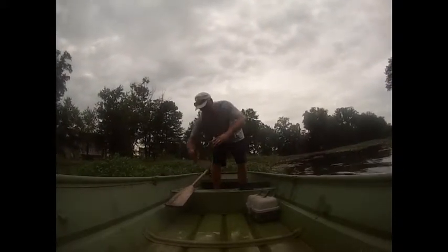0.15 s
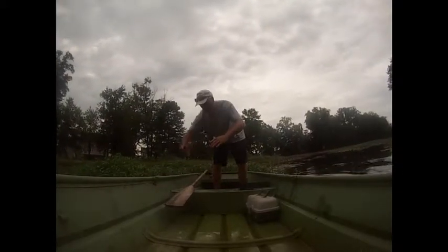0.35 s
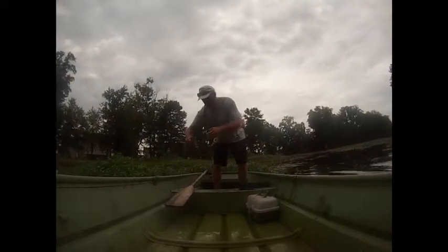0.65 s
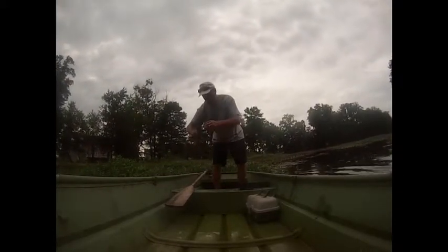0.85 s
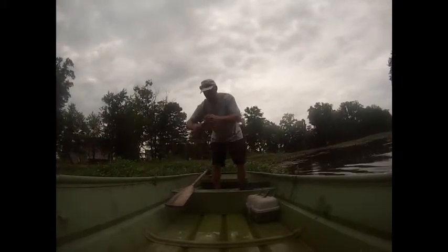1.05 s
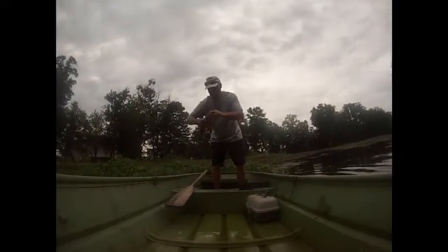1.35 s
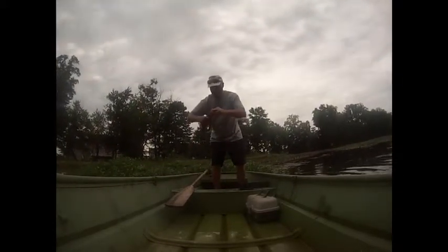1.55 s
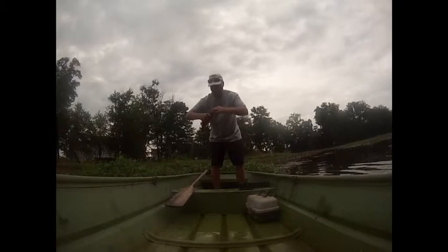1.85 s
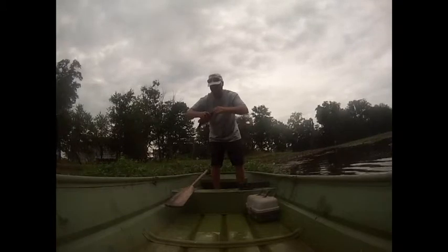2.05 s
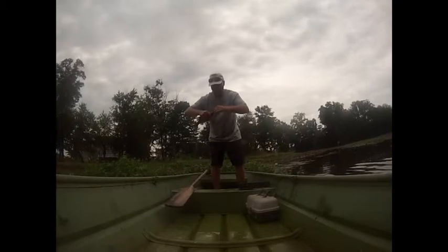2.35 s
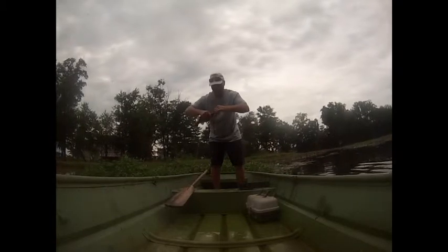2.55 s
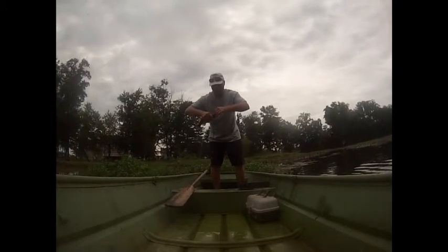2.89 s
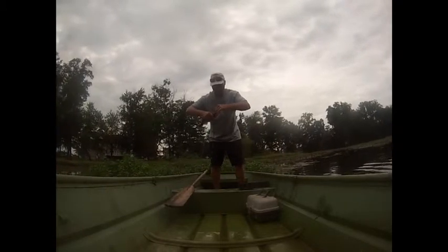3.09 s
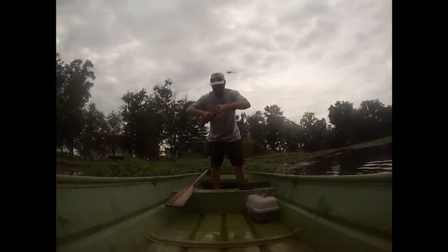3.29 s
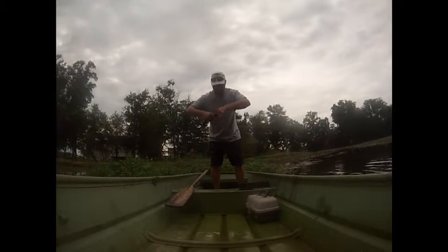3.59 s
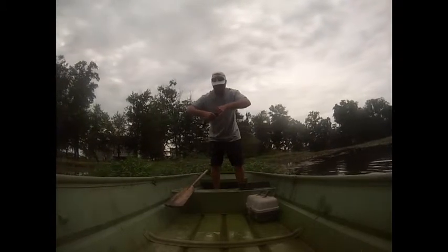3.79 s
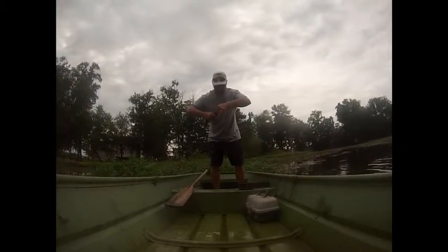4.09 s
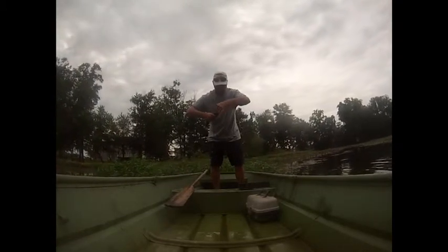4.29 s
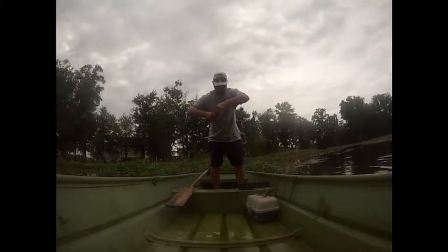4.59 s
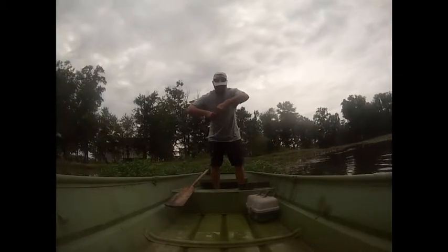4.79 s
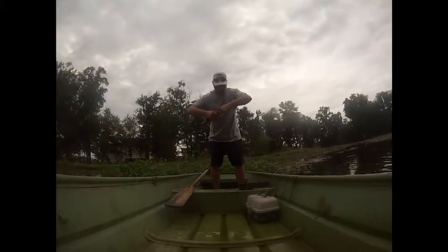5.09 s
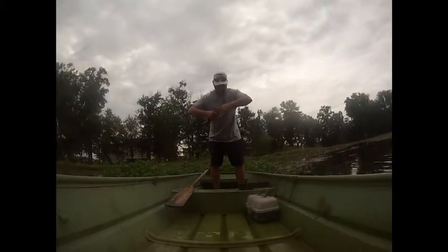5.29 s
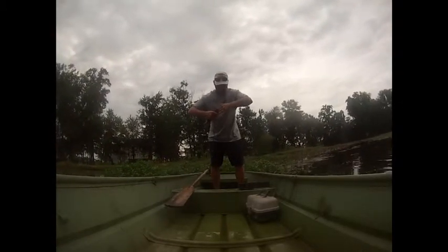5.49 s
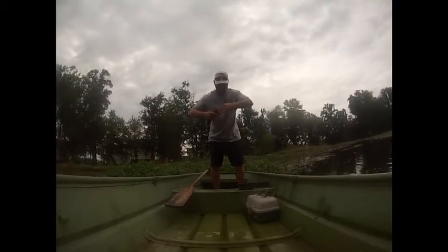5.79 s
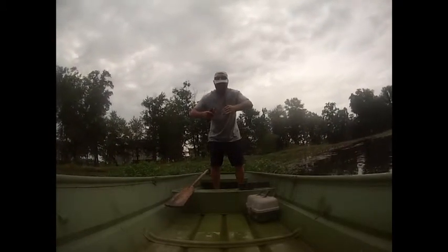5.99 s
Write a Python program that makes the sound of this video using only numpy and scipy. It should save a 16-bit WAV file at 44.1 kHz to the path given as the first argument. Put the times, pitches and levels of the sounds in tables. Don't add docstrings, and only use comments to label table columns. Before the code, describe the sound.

A rapid cluster of hollow thuds and gritty scrapes in an aluminum boat, then a steady low engine drone with water murmur and faint ticks.

```python
import sys
import numpy as np
from scipy import signal
from scipy.fft import rfft, irfft, next_fast_len
from scipy.io import wavfile
from scipy.ndimage import map_coordinates

SR = 44100
rng = np.random.default_rng(int(sys.argv[2]) if len(sys.argv) > 2 else 0)


def generate_wav(signal):
    frames = np.transpose(np.atleast_2d(signal))
    scaled = np.clip(frames, -1, 1) * 32767
    pcm = np.round(scaled).astype(np.int16)
    wavfile.write(sys.argv[1], SR, pcm)


def how_loud(loudness_db):
    steps = np.asarray(loudness_db, float) / 20
    return 10 ** steps


N = 270770
TIME = np.arange(N) / SR


def unit(x):
    return x / np.sqrt(np.mean(x ** 2) + 1e-20)


def curves(rows):
    s, *columns = np.transpose(rows)
    return [np.interp(TIME, s, column) for column in columns]


def wobble(rate):
    knots = rng.standard_normal(int(N * rate / SR) + 4)
    return map_coordinates(knots, [TIME * rate])


def filtered(x, response):
    m = next_fast_len(N + SR // 2)
    return irfft(rfft(x, m) * response(np.fft.rfftfreq(m, 1 / SR)), m)[:N]


def noise(spectrum):
    f, db = np.transpose(spectrum)

    def colour(hz):
        return how_loud(np.interp(np.log(hz + 1), np.log(f + 1), db))

    return unit(filtered(rng.standard_normal(N), colour))


def swell(s, rise, t60):
    t = TIME - s
    onset = np.exp(-np.clip(t / rise, -9, 0) ** 2 * 2)
    decay = how_loud(-60 * np.maximum(t, 0) / t60)
    return np.where(t < 0, onset, decay)


def bump(s, half):
    return np.exp(-((TIME - s) / half) ** 2)


def add(out, s, x):
    out[round(s * SR):][:len(x)] += x


def resonant(force, modes):
    def response(f):
        total = 0
        for k, (centre, width, db) in enumerate(modes):
            damping = 1j * f * width
            total = total + (-1) ** k * how_loud(db) * damping / (centre * centre - f * f + damping)
        return total

    return filtered(force, response)


ENGINE_RUN = [(0, 96.6, -45.5, 5), (.3, 96.3, -41.5, 15.5), (.7, 94.18, -42.5, 9.5), (1.3, 93.75, -40.5, 8),
              (1.6, 94.2, -43.5, 5), (1.8, 93.86, -40, 1), (2.02, 93.77, -47.5, 2), (2.3, 94.3, -38, -1),
              (2.55, 93.94, -40.5, -1), (2.85, 94.1, -37, -2.5), (3.0, 94.1, -38.5, 0.5),
              (3.45, 94.6, -35, -3.5), (3.9, 95.55, -34.5, 1), (4.55, 94.96, -32, -3.5),
              (5.2, 96, -37, -4.5), (5.75, 96.84, -37.5, 0.5), (6.14, 96.5, -37, 6)]
# (multiple of the firing rate, level/dB)
UNEVEN_TONES = [(0.501, -10), (0.752, -19), (1.249, 1), (1.5, -9.5), (1.75, -7), (3, -8), (4.998, -36),
                (5.25, -25), (2.5, -17)]
# (multiple, level/dB)
FAINT_MULTIPLES = [(2, -61), (4, -73.5), (6, -66)]
# (t/s, multiple, level/dB, half length/s)
AIR_SURGES = [(0, 2, -44.5, .25), (0.61, 2, -41, 0.14), (1.4, 2, -52.5, .15), (2.145, 2, -54.5, 0.32),
              (2.79, 2, -52, 0.16), (4.15, 2, -49, 0.59), (5.148, 2, -42.5, 0.67), (0.597, 4, -49.5, 0.15),
              (1, 4, -63, 0.097), (1.4, 4, -59, 0.11), (1.857, 4, -54, 0.15), (2.4, 4, -58, .25),
              (3.094, 4, -60.5, 0.13), (4.45, 4, -58.5, 0.77), (5.202, 4, -57.5, 0.29),
              (6.007, 4, -58.5, 0.19), (.45, 6, -55.5, .3), (1.3, 6, -59, 0.23), (2.296, 6, -59, 0.31),
              (2.844, 6, -64, 0.21), (3.756, 6, -62.5, 0.39), (4.176, 6, -58, 0.041),
              (4.39, 6, -51.5, 0.052), (4.75, 6, -60, .4), (5.02, 6, -56.5, 0.057)]
# (t/s, extra level/dB, half length/s)
CYLINDER_LOPES = [(.8, 5.5, 0.2), (2.753, 3, 0.19), (5.707, 6, 0.58)]
# (f/Hz, level/dB per Hz)
ROAR_COLOUR = [(90, -32), (160, 1), (300, 1), (420, -0.5), (550, 0), (750, -4.5), (950, -16.5), (1500, -46)]


def engine():
    roar_db, uneven_db = -56, -52.5
    uneven_follows = 0.36
    hz, firing_db, labour_db = curves(ENGINE_RUN)
    phase = 2 * np.pi * np.cumsum(hz) / SR + 0.074 * wobble(7)

    def tone(k, db, lag):
        flutter_db = 0.48 * np.sqrt(k) * wobble(6.3)
        return np.sqrt(2) * how_loud(db + flutter_db) * np.cos(k * phase + lag)

    drone = tone(1, firing_db, 0)
    for k, faint_db in FAINT_MULTIPLES:
        size = how_loud(faint_db)
        for s, multiple, db, half in AIR_SURGES:
            if round(multiple) == round(k):
                size = size + how_loud(db) * bump(s, half)
        drone += size * tone(round(k), 0, np.pi)

    lope_db = sum(db * bump(s, half) for s, db, half in CYLINDER_LOPES)
    beat_db = uneven_db + uneven_follows * labour_db + lope_db
    for k, db in UNEVEN_TONES:
        drone += tone(k, beat_db + db, rng.uniform(0, 2 * np.pi))

    throb = how_loud(1.6 * np.cos(phase / 4))
    return drone + how_loud(roar_db + labour_db) * throb * noise(ROAR_COLOUR)


# (f/Hz, width/Hz, level/dB)
WALL_MODES = [(136, 22, -7), (352, 43, -4), (509.5, 15, -2.5), (592, 24, -3.5), (716, 50, -9),
              (783, 47, -9), (907, 33, -8.5), (1007.6, 16, 4.5), (1101, 68, -8), (1585, 230, -25),
              (1880, 320, -26), (2620, 120, -29.5), (3500, 130, -38)]


def wall(force):
    return resonant(force, WALL_MODES)


# (f/Hz, level/dB per Hz)
MURMUR_COLOUR = [(12, -36), (20, -18), (43, -2.5), (70, -5.5), (102, -4.5), (146, -5), (200, -15.5),
                 (238, -16), (430, -20.5), (493, -12), (676, -22), (873, -20), (982, -15.5), (1270, -27.5),
                 (2200, -39.5), (2860, -63), (4840, -120)]
# (f/Hz, level/dB per Hz)
HISS_COLOUR = [(710, -4.5), (1200, -3.5), (1270, -17), (1440, -13), (1830, -6), (2170, -12.5), (2950, -6.5),
               (3960, -13), (5680, -11), (6380, -17.5), (7470, -3), (8490, -23.5), (10500, -26.5),
               (13100, -25.5), (15000, -29)]
# (t/s, level/dB, rise/s, t60/s)
HULL_ROCKING = [(.32, -39, 0.39, 1.3), (5.37, -55.5, 0.61, 1.09)]


def air():
    stir = how_loud(-46.5) + sum(how_loud(db) * swell(s, rise, t60) for s, db, rise, t60 in HULL_ROCKING)
    water = noise(MURMUR_COLOUR) + 0.088 * unit(wall(rng.standard_normal(N)))
    murmur = stir * how_loud(0.56 * wobble(9)) * water
    hiss_db = -57 - 0.23 * (TIME - 3) + 0.2 * wobble(3.9)
    return murmur + how_loud(hiss_db) * noise(HISS_COLOUR)


# (t/s, cloth level/dB, wall level/dB, rise/s, t60/s)
DRAGS = [(.04, -61, -57, .1, .6), (0.273, -55, -25, .015, 0.17), (.39, -57.5, -44.5, 0.065, 1.5),
         (.47, -71, -57, 0.094, 0.26), (.58, -68, -44, 0.0064, 0.052), (2.02, -60.5, -70, 0.086, 0.88),
         (2.06, -74, -58, .01, 0.54), (2.19, -66, -71, .015, .05)]
# (t/s, level/dB, half length/s)
LINE_RUBS = [(3.82, -74, .02), (3.91, -73, 0.022), (4.05, -75, .025), (4.199, -78, 0.018),
             (4.271, -74, .02), (4.48, -76, .02)]


def rustle():
    cloth = noise([(1200, -40), (2200, -2.0), (3000, 3.5), (4200, -2.5), (5500, 1.5),
                   (7000, -15.0), (14000, -32.5)])
    line = noise([(9000, -28), (12500, -3), (13500, 0), (15000, -6), (16000, -38)])
    body = unit(wall(rng.standard_normal(N)))
    drag = sum(how_loud(db) * swell(s, rise, t60) for s, db, _, rise, t60 in DRAGS)
    shake = sum(how_loud(db) * swell(s, rise, t60) for s, _, db, rise, t60 in DRAGS)
    rub = sum(how_loud(db) * bump(s, half) for s, db, half in LINE_RUBS)
    clumps = how_loud(1.6 * wobble(90))
    return drag * clumps * cloth + shake * body + rub * line


# (t/s, wall level/dB, grit level/dB, rise/s, t60/s) # the row at 0.267 s is the bright rasp of
GEAR_SCUFFS = [(0.167, -36, -50, 0.044, 0.059), (0.176, -26, -27, 0.0055, 0.17),
               (0.179, -27, -37, 0.011, 0.11), (.197, -29, -58, 0.007, 0.18),
               (0.267, -28, -61, 0.0075, 0.14), (0.59, -20.5, -30, 0.0089, 0.12),
               (0.604, -24.5, -57, 0.0067, 0.21), (0.65, -40, -62, 0.0091, 0.11)]
# (f/Hz, level/dB per Hz)
GRIT_COLOUR = [(710, -20), (1200, -5), (2240, -15.5), (2540, -12.5), (3530, -18), (5500, -18), (8490, -32),
               (9630, -46.5), (12200, -38.5), (15000, -58)]


def scuffs():
    force = sum(how_loud(db) * swell(s, rise, 0.71 * t60) for s, db, _, rise, t60 in GEAR_SCUFFS)
    spray = sum(how_loud(db) * swell(s, rise, 0.55 * t60) for s, _, db, rise, t60 in GEAR_SCUFFS)
    shaken = how_loud(21.5) * wall(force * rng.standard_normal(N))
    return shaken + spray * how_loud(1.6 * wobble(400)) * noise(GRIT_COLOUR)


# (f/Hz, level/dB, t60/s)
PLATE_MODES = [(73.5, -11.5, 0.082), (143.2, 2, 0.15), (158.3, -3.5, 0.14), (224.2, -9.5, 0.21),
               (288, -10, 0.11), (362.4, -11.5, 0.24), (414, -16.5, 0.19), (530, -21.5, 0.4),
               (592, -31, 0.21), (707, -24.5, 0.61), (777, -17, 0.12), (896, -8, 0.1), (949, -13, 0.092),
               (1120, -21.5, 0.09), (1340, -16.5, 0.082), (1494, -14, 0.052), (1770, -27.5, .06)]
# (t/s, level/dB, contact/ms, drive of the plate's belly/dB) # the belly drive is low near a
# rib, high in mid-panel # the shortest contacts near 0.17-0.21 s and 0.59-0.62 s are the sliding gear's ring,
# played as quick knocks
BLOWS = [(.167, -13.5, 0.53, -9.5), (.178, -14.5, 7.2, 6), (0.182, -18.5, 0.5, -5), (0.194, -28, .4, -7),
         (.205, -23.5, 0.35, -4), (0.235, -11, 7.9, 3.5), (0.264, -22, 0.35, -22),
         (0.2653, -10.5, 1.17, -2.5), (0.2706, -11, 0.95, 1.5), (.283, -14, 0.83, -9),
         (0.301, -13, 0.95, -12.5), (0.329, -17, 2.3, 4), (.341, -19, 1.4, -4), (0.374, -21.5, 4.5, 8),
         (0.433, -13.5, 2, -8.5), (0.457, -29, 1.7, 5.5), (0.466, -20.5, 1.8, -1), (.498, -17, 1.6, -20),
         (.586, -21, 0.26, -5), (.598, -14, 0.86, -18), (.606, -19.5, 0.26, -18), (.617, -18, 0.29, -10),
         (0.627, -26.5, 1.1, -2), (0.667, -38, 2.9, -9)]


def thuds():
    out, t = np.zeros(N), np.arange(SR // 2) / SR
    hz, level, t60 = np.transpose(PLATE_MODES)[:, :, None]
    sides = (-1) ** np.arange(len(PLATE_MODES))[:, None]
    build = 1 - np.exp(-t * hz / 0.31)
    modes = sides * how_loud(level - 60 * t / t60) * build * np.sin(2 * np.pi * hz * t)
    scatter_db = rng.standard_normal((len(BLOWS), len(PLATE_MODES), 1))
    for (s, db, ms, belly_db), mode_db in zip(BLOWS, scatter_db):
        lowness = np.clip((600 - hz) / 400, 0, 1)
        softening = 1 + (hz * ms / 700) ** 4
        drive = how_loud(db + mode_db + belly_db * lowness) / softening
        add(out, s, np.sum(drive * modes, axis=0))
    return out


# (t/s, peak level/dB, f/Hz)
WALL_TAPS = [(0.895, -36.5, 748.6), (1.122, -34, 568), (1.987, -33, 592), (3.5, -40, 580), (3.54, -40, 550)]
# (t/s, peak level/dB)
METAL_TICKS = [(3.5545, -35), (4.1774, -59), (4.771, -37)]
# (f/Hz, width/Hz, level/dB)
TICK_METAL = [
    [(1900, 560, -10), (3440, 320, -2), (4600, 560, -0.5), (5300, 700, -2.5), (8250, 450, -5.5),
     (12100, 2500, -21)],
    [(8310, 570, -2), (9480, 900, -8)],
    [(950, 280, 3), (1620, 300, 0.5), (3300, 250, -6), (3924, 300, -11), (5130, 490, -2.5), (7250, 350, -6),
     (8400, 420, -4), (11800, 900, -11), (13000, 900, -14)],
]


def tackle():
    out, t = np.zeros(N), np.arange(SR // 10) / SR
    for s, db, hz in WALL_TAPS:
        ring = how_loud(db - 60 * t / 0.073) * (1 - np.exp(-t / 0.0031))
        add(out, s - 0.002, ring * np.sin(2 * np.pi * hz * t))
    for (s, db), metal in zip(METAL_TICKS, TICK_METAL):
        scrape = how_loud(db + 6.0) * swell(s + 0.0003, 0.0034, 0.026)
        out += resonant(scrape * rng.standard_normal(N), metal)
    return out


# (t/s, f/Hz, level/dB)
TRILL = [(3.33, 5140, -75), (3.37, 5100, -69), (3.43, 5000, -67), (3.47, 5020, -64), (3.49, 4990, -72),
         (3.52, 4950, -69), (3.54, 4955, -85)]


def bird():
    hz, db = curves(TRILL)
    sings = (TIME > TRILL[0][0]) * (TIME < TRILL[-1][0])
    phase = 2 * np.pi * np.cumsum(hz + 100 * wobble(300)) / SR
    return sings * how_loud(db + 2.5 * wobble(150)) * np.sin(phase)


def scene():
    mix = engine() + air() + rustle() + scuffs() + thuds() + tackle() + bird()
    return mix[None]


def low_pass(x):
    return signal.sosfilt(signal.butter(12, 15170, fs=SR, output="sos"), x)


def record(dry):
    heard = filtered(dry[0], lambda hz: (1 + (hz / 14000) ** 16) ** -.5)
    return low_pass(heard[None])


dry = scene()
out = record(dry)
generate_wav(out)
```